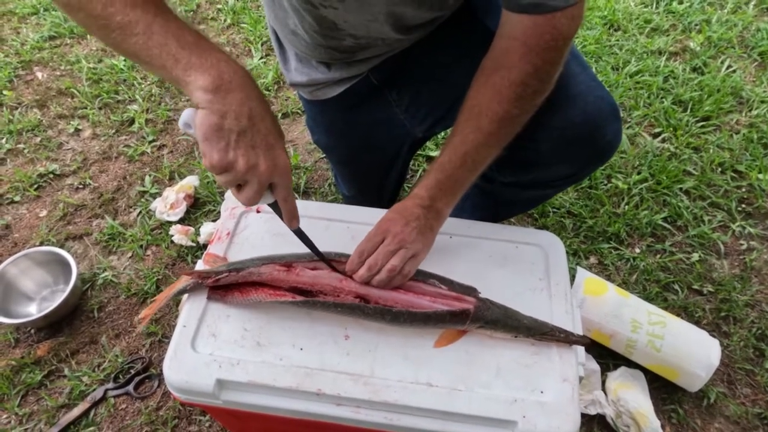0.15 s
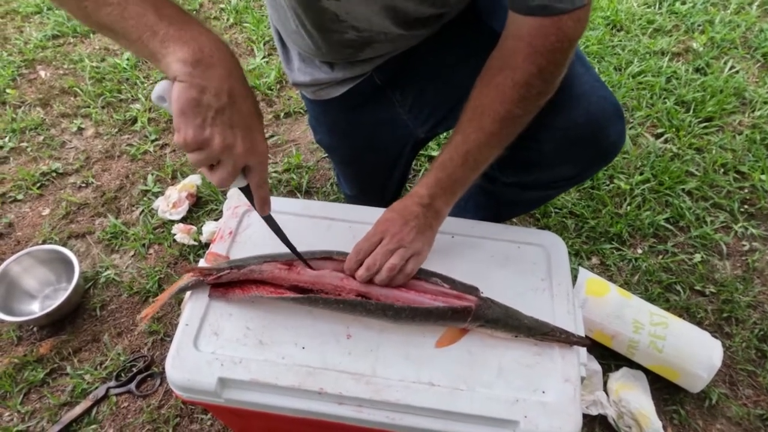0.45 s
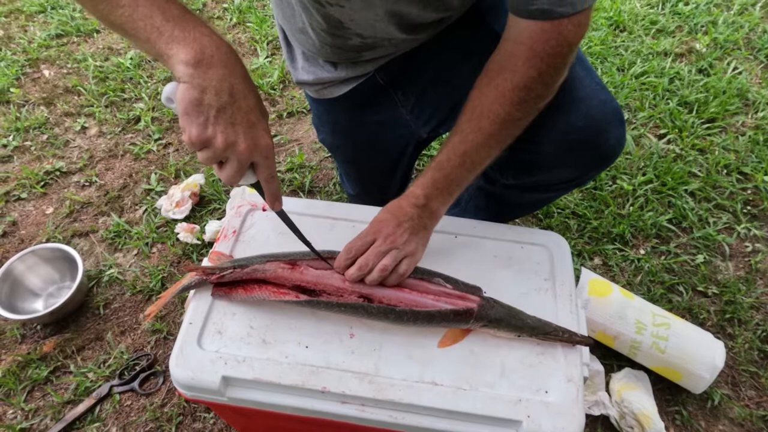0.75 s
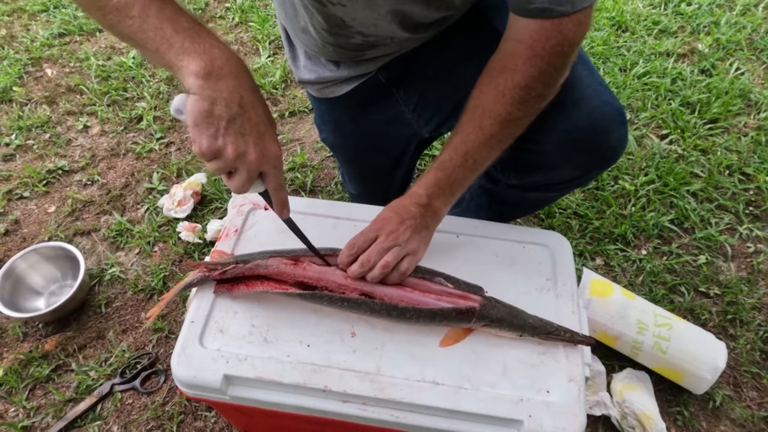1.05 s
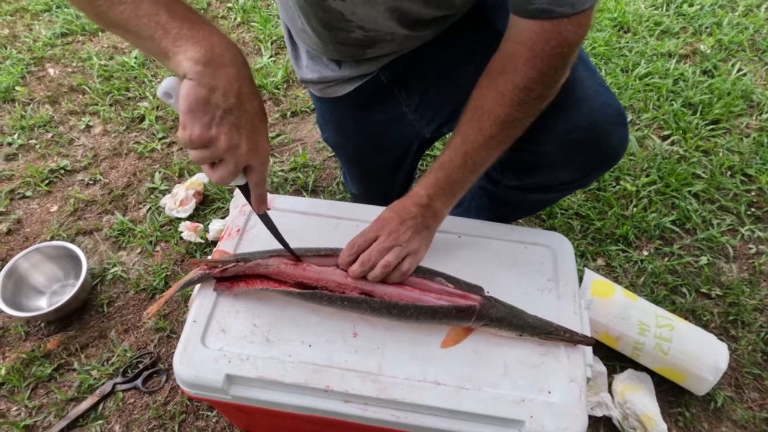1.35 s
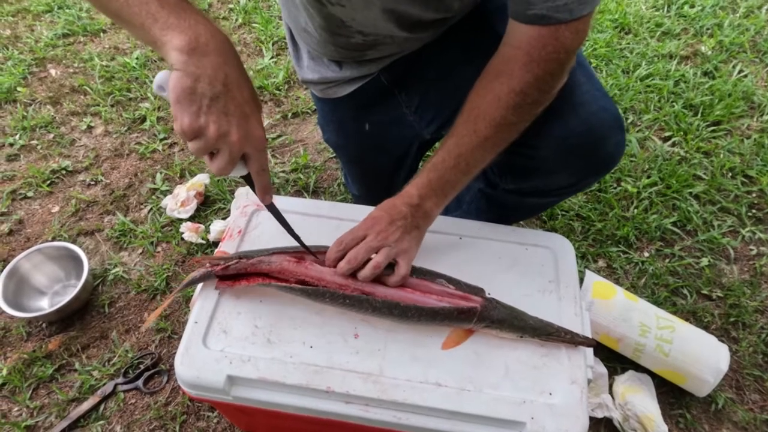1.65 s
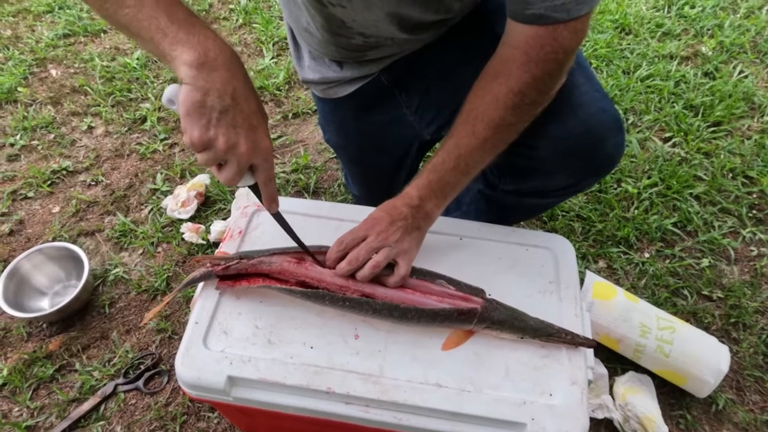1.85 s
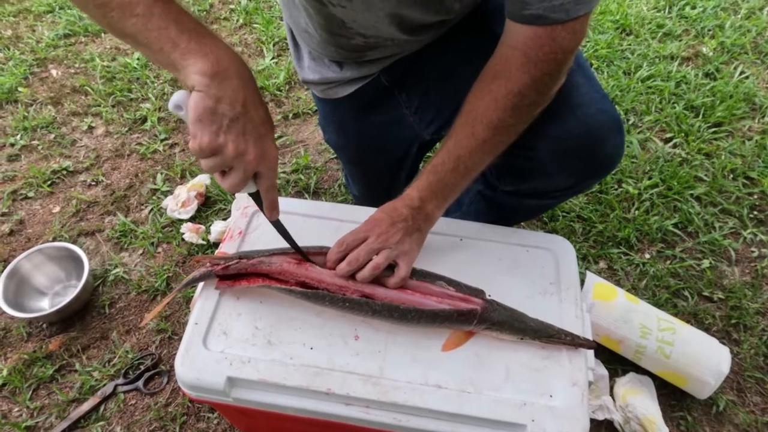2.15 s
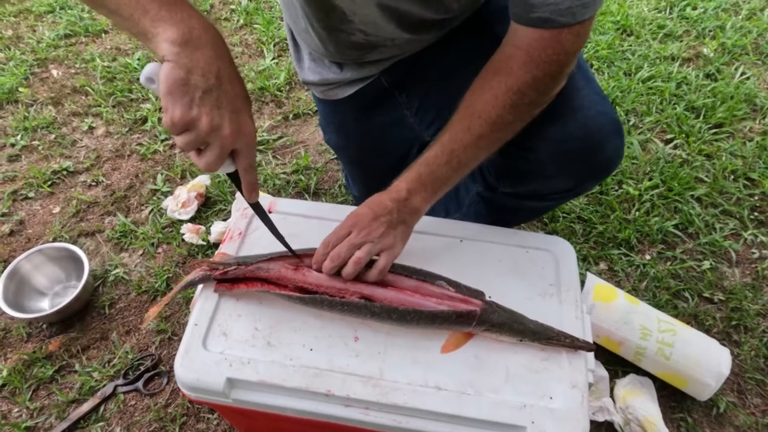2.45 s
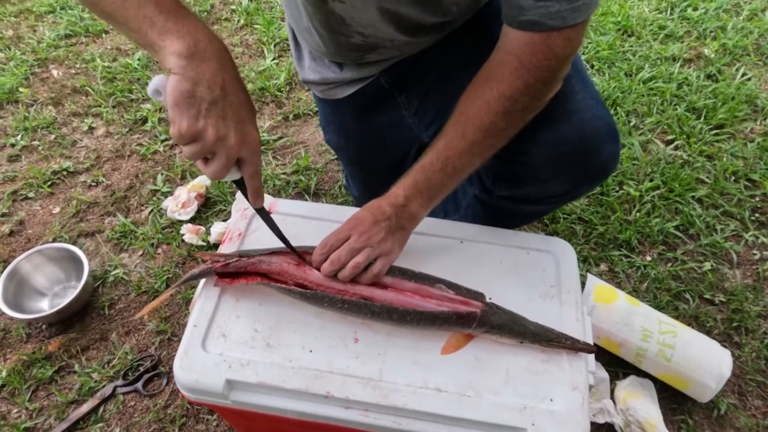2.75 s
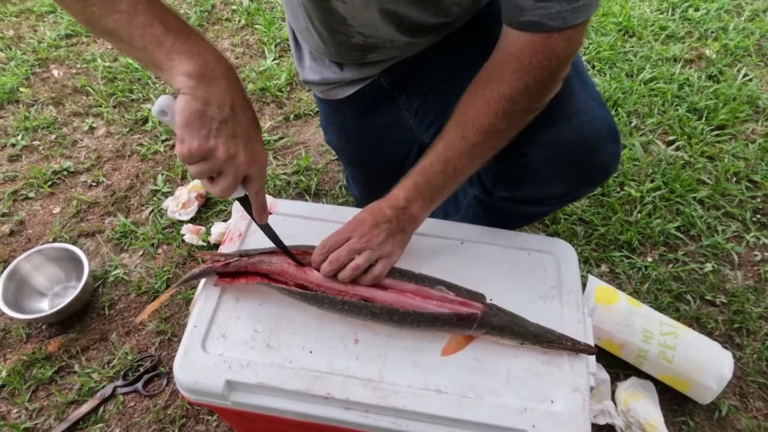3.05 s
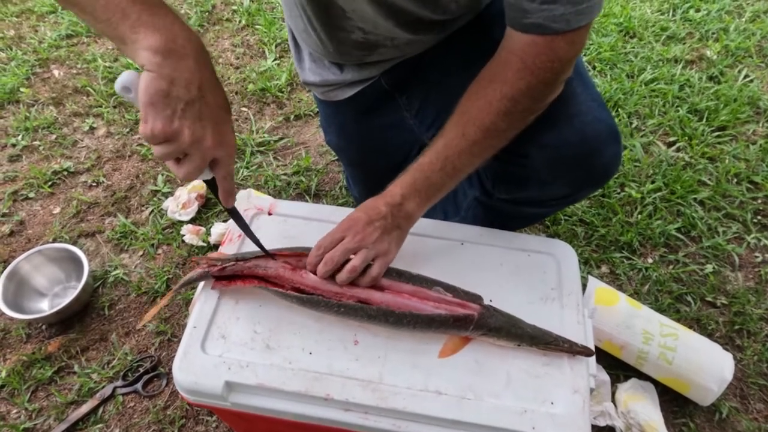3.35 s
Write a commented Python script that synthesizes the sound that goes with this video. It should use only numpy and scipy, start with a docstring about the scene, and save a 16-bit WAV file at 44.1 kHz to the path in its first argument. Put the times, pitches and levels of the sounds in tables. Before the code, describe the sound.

A knife filleting a fish, heard close in an open garden. Tight clusters of sharp bony snaps come near 0.4, 1.4, 2.3 and 3.25 seconds, each with dull hollow cooler thumps and a short crackling wet rasp that dies away. A tiny steel squeak marks the third stroke; soft taps fall near 1.9 and 3.5. Behind, a low motor hum sinks around 1.2 and returns, with faint rumble and high insect buzz.

```python
"""A far motor hum that sinks and returns, a low outdoor rumble, a buzzing katydid and a high insect chorus.
Over them a thin knife is pushed along a fish backbone in four short strokes, on the lid of a plastic cooler.
In each stroke the tip snaps over bones, the hollow cooler thumps and the blade rasps on through wet flesh.
Air, chorus and rasp are shaped noise; hum, katydid and squeaks are wavering sines; snaps excite ringing modes."""
import sys
import numpy as np
from scipy import signal
from scipy.fft import rfft, irfft, next_fast_len
from scipy.io import wavfile
from scipy.ndimage import map_coordinates

SR = 44100
rng = np.random.default_rng(int(sys.argv[2]) if len(sys.argv) > 2 else 0)


def wav_out(sig):
    """Save sig, one row per channel (or a flat mono array), as 16-bit PCM at SR to the path in sys.argv[1]."""
    wavfile.write(sys.argv[1], SR, np.round(np.clip(np.atleast_2d(sig).T, -1, 1) * 32767).astype(np.int16))


N = 154350


def amp(db):
    """Decibels to gain."""
    return 10 ** (np.asarray(db) / 20)


def unit(x):
    """Scale to rms 1."""
    return x / np.sqrt(np.mean(x ** 2) + 1e-20)


def along(points, hz):
    """Interpolate (freq_hz, value) points on a log frequency axis."""
    point_hz, value = np.transpose(points)
    return np.interp(np.log(hz + 1), np.log(point_hz + 1), value)


def wobble(knots_per_s):
    """Smooth random curve through normally distributed knots."""
    knots = rng.standard_normal(int(N * knots_per_s / SR) + 4)
    return map_coordinates(knots, [np.arange(N) * knots_per_s / SR])


def filtered(x, response):
    """Multiply the spectrum of x by a response of frequency in Hz."""
    size = x.shape[-1]
    padded = next_fast_len(size + 8192)
    spectrum = rfft(x, padded) * response(np.fft.rfftfreq(padded, 1 / SR))
    return irfft(spectrum, padded)[..., :size]


def spread(pair, alike):
    """Turn two unrelated signals into left and right of the given likeness."""
    def mid_side_gains(hz):
        turn = np.arccos(np.clip(along(alike, hz), -1, 1)) / 2
        return np.array([np.cos(turn), np.sin(turn)])

    mid, side = filtered(pair, mid_side_gains)
    return np.array([mid + side, mid - side])


def noise(gain, alike, size):
    """Stereo noise of rms 1 with a gain curve over frequency."""
    white = rng.standard_normal((2, size))
    return unit(spread(filtered(white, gain), alike))


def band(centre_hz, width_hz, alike):
    """Stereo noise of rms 1 in one resonance."""
    return noise(lambda hz: (1 + ((hz - centre_hz) / width_hz) ** 2) ** -1.5, alike, size=N)


def add(out, start_s, sound):
    """Mix a sound in at start_s."""
    part = out[..., round(start_s * SR):][..., :sound.shape[-1]]
    part += sound[..., :part.shape[-1]]


# outdoor air spectrum: freq_hz, relative_level_db
AIR_SPECTRUM = [(15, -6), (26, 9), (35, -1.5), (75, -8), (105, 1), (140, -9), (195, -7.5), (250, -22),
                (400, -22.5), (850, -30.5), (1300, -24.5), (2400, -40), (3200, -36.5), (4000, -42),
                (5400, -34), (6300, -42), (10500, -34.5), (11600, -50.5), (13800, -42), (15000, -82)]
# left-right likeness of background noise: freq_hz, likeness_0_to_1
AIR_ALIKE = [(110, 0.965), (400, 0.7), (8000, 0.55)]
# swells of far noise: centre_s, half_length_s, level_db
SWELLS = [(0.605, 0.094, -58), (2.517, 0.15, -61), (2.798, 0.082, -63.5)]
AIR_DB = -47.5
FAR_HZ, FAR_WIDTH_HZ = 1317, 310


def outdoors():
    """Low rumble and air as shaped noise; a narrow band of far noise swells under Gaussian envelopes."""
    t = np.arange(N) / SR
    level = amp(AIR_DB + 0.68 * wobble(4.846))
    air = level * noise(lambda hz: amp(along(AIR_SPECTRUM, hz)), AIR_ALIKE, size=N)
    swell = sum(amp(db) * np.exp(-((t - centre_s) / half_s) ** 2) for centre_s, half_s, db in SWELLS)
    return air + swell * band(FAR_HZ, FAR_WIDTH_HZ, AIR_ALIKE)


# motor hum level: time_s, level_db
HUM_LEVEL = [(0, -43.5), (.35, -43), (.6, -49.5), (0.899, -49), (1.2, -59.5), (1.7, -49), (2.1, -46),
             (2.85, -46), (3.15, -53.5)]
HUM_HZ, HUM_WAVER_HZ = 58.63, 0.55


def hum():
    """A far motor drones on one low note: a slightly wavering sine of changing level."""
    time_s, level_db = np.transpose(HUM_LEVEL)
    phase = 2 * np.pi * np.cumsum(HUM_HZ + HUM_WAVER_HZ * wobble(4.17)) / SR
    return amp(np.interp(np.arange(N) / SR, time_s, level_db)) * np.sqrt(2) * np.sin(phase)


# one katydid wing stroke: share_of_stroke, pitch_hz, level_db
WING_STROKE = [(0, 9900, -11), (.2, 10500, -4), (.42, 10680, 1), (.66, 10450, -3), (.84, 9500, -5.5),
               (1, 8600, -10)]
WING_STROKES_PER_S, KATYDID_GAIN_DB, KATYDID_ALIKE = 69.3, -60, 0.91
KATYDID_ROUGH_HZ, WING_TOP_HZ = 230, 11500  # pitch roughness; upper edge of the sweeping song
WING_GRIT_DB = 1.5  # unevenness of the file's teeth
WING_NOTE_HZ, WING_NOTE_WAVER_HZ, WING_NOTE_DB = 10710, 29.8, -4.5  # the wing's main resonance
WING_RING_HZ, WING_RING_WIDTH_HZ, WING_RING_DB = 13350, 310, -11  # the wing's upper resonance
CHORUS_HZ, CHORUS_WIDTH_HZ, CHORUS_DB = 7748, 620, -59.5  # many far insects blur into one band
INSECT_LEFT_DB = 1.5  # left minus right


def insects():
    """A katydid buzzes, pitch arching in every wing stroke and wing resonances sounding, over a far chorus."""
    share, pitch_hz, level_db = np.transpose(WING_STROKE)
    stroke = np.arange(N) / SR * WING_STROKES_PER_S % 1
    force = amp(np.interp(stroke, share, level_db))
    alike = [(WING_RING_HZ, KATYDID_ALIKE)]

    rough = np.array([wobble(3000), wobble(3000)])
    pitch = np.interp(stroke, share, pitch_hz) + KATYDID_ROUGH_HZ * rough
    tone = amp(WING_GRIT_DB * wobble(830)) * np.sin(2 * np.pi * np.cumsum(pitch, axis=1) / SR)
    song = unit(spread(filtered(tone, lambda hz: 1 / (1 + (hz / WING_TOP_HZ) ** 80)), alike))

    note_hz = WING_NOTE_HZ + WING_NOTE_WAVER_HZ * wobble(WING_STROKES_PER_S)
    note = amp(WING_NOTE_DB) * np.sqrt(2) * np.sin(2 * np.pi * np.cumsum(note_hz) / SR)
    # force squared: loudest at the height of the stroke
    ring = amp(WING_RING_DB) * force ** 2 * band(WING_RING_HZ, WING_RING_WIDTH_HZ, alike)
    katydid = amp(KATYDID_GAIN_DB) * force * (song + note + ring)

    chorus = amp(CHORUS_DB) * band(CHORUS_HZ, CHORUS_WIDTH_HZ, AIR_ALIKE)
    return (katydid + chorus) * amp([[INSECT_LEFT_DB / 2], [-INSECT_LEFT_DB / 2]])


YARD_DB, YARD_T60_S = -9.5, 0.19


def yard(x):
    """A faint, short scatter from the surroundings: convolution with decaying noise."""
    t = np.arange(SR // 2) / SR
    tail = rng.standard_normal((2, len(t))) * amp(-60 * t / YARD_T60_S)
    scatter = signal.fftconvolve(x, tail / np.linalg.norm(tail[0]), axes=1)[:, :N]
    return amp(YARD_DB) * scatter


# cooler modes: freq_hz, level_db, t60_s
COOLER_MODES = [(100.5, -15, 0.23), (125.5, 1, 0.14), (148.4, -5.5, 0.3), (188, -19, 0.25),
                (236, -17, 0.071), (326, -17.5, 0.063), (384.4, -18, 0.066)]
THUMP_LAG_S, THUMP_RISE_S = 0.0032, 0.0042


def cooler():
    """Each snap jolts the hollow cooler through the fish: its modes ring and decay."""
    out, t = np.zeros(N), np.arange(SR // 2) / SR
    modes = sum(amp(db - 60 * t / t60_s) * np.sin(2 * np.pi * hz * t) for hz, db, t60_s in COOLER_MODES)
    thump = -modes * (1 - np.exp(-t / THUMP_RISE_S))
    for start_s, _, thump_db, _, _ in BONES:
        add(out, start_s + THUMP_LAG_S, amp(thump_db) * thump)
    return out


SHUDDER_DB, SHUDDER_WIDTH_HZ = 3.5, 11.5  # level over the rasp; width of each mode


def shudder():
    """The dragging blade keeps the cooler rumbling softly: noise through its modes."""
    def response(f):
        return sum(amp(db) / (1 + 1j * (f - hz) / SHUDDER_WIDTH_HZ) for hz, db, _ in COOLER_MODES)

    rumble = unit(filtered(rng.standard_normal(N), lambda f: np.abs(response(f)) ** 2))
    return amp(SHUDDER_DB) * cutting() * rumble


# dull taps of the hand and the knife handle: start_s, level_db
TAPS = [(1.8822, -46), (3.482, -44.5)]
# tap spectrum: freq_hz, relative_level_db
TAP_SPECTRUM = [(400, 4), (900, -7), (1500, -1.5), (2500, -14.5), (5000, -19.5), (12000, -46)]
# left-right likeness of knife noise: freq_hz, likeness_0_to_1
KNIFE_ALIKE = [(200, .995), (600, 0.88), (2000, 1), (12000, 0.85)]
TAP_T60_S = 0.08


def taps():
    """Soft, dull contacts: decaying shaped noise."""
    out, t = np.zeros((2, N)), np.arange(SR // 6) / SR
    for start_s, db in TAPS:
        thud = noise(lambda hz: amp(along(TAP_SPECTRUM, hz)), KNIFE_ALIKE, size=len(t))
        add(out, start_s, amp(db - 60 * t / TAP_T60_S) * thud)
    return out


# steel squeaks on bone: start_s, length_s, start_hz, end_hz, level_db
SQUEAKS = [(2.305, 0.022, 5900, 7900, -36.5), (.447, 0.012, 6200, 6300, -43)]
SQUEAK_ROUGH_HZ, SQUEAK_FLICKER_DB = 300, 3.8


def squeaks():
    """Steel sticks and slips on bone: a short, rough, gliding whistle."""
    out = np.zeros(N)
    for start_s, length_s, start_hz, end_hz, db in SQUEAKS:
        share = np.linspace(0, 1, int(length_s * SR))
        hz = start_hz + (end_hz - start_hz) * share + SQUEAK_ROUGH_HZ * wobble(2480)[:len(share)]
        swell = np.sqrt(np.abs(np.sin(np.pi * share)))
        flicker = amp(SQUEAK_FLICKER_DB * wobble(770)[:len(share)])
        add(out, start_s, amp(db) * swell * flicker * np.sin(2 * np.pi * np.cumsum(hz) / SR))
    return out


# blade pushes through flesh: start_s, end_s, level_db
PUSHES = [(0.441, 0.467, -43.5), (0.477, 0.481, -47), (1.404, 1.435, -43.5), (1.453, 1.505, -55),
          (2.317, 2.402, -45.5), (2.429, 2.446, -54), (3.264, 3.28, -48.5), (3.299, 3.373, -50)]
RASP_RISE_S, RASP_T60_S = 0.0092, 0.075
RASP_TAIL_DB, RASP_TAIL_T60_S = -15, 0.54  # slower wet tail


def cutting():
    """How hard the blade cuts: each push rises, holds and dies away in a wet tail."""
    t = np.arange(N) / SR
    level = np.zeros(N)
    for start_s, end_s, db in PUSHES:
        after_s = np.maximum(t - end_s, 0)
        rise = np.clip((t - start_s) / RASP_RISE_S, 0, 1)
        fall = amp(-60 * after_s / RASP_T60_S) + amp(RASP_TAIL_DB - 60 * after_s / RASP_TAIL_T60_S)
        level += amp(db) * rise * fall
    return level


SLIPS_PER_S, SLIP_DECAY_S, SLIP_DB = 120, 0.0025, 7  # mean rate; time constant; gain over the steady cut


def slips():
    """The edge catches and lets go at an uneven rate; each slip is a sudden, decaying spurt."""
    gap, size = rng.random((2, 1000))
    at = (np.cumsum(0.5 + gap) * SR / SLIPS_PER_S).astype(int)
    kicks = np.bincount(at, 2 * size ** 2, N)[:N]
    return 1 + amp(SLIP_DB) * signal.lfilter([1], [1, -np.exp(-1 / (SLIP_DECAY_S * SR))], kicks)


# spectrum of the rasp and of the tip's crack: freq_hz, relative_level_db
RASP_SPECTRUM = [(230, 5), (450, -6), (1000, -12.5), (1500, 0), (2100, -6), (3100, -5), (4100, -1.5),
                 (5400, -6), (6700, 3), (8200, -6), (9900, -13.5), (11600, -8), (13200, -15), (14500, -40)]
GRAINS_PER_S, GRAIN_DECAY_S, RASP_SMOOTH = 450, 0.00069, 0.7  # RASP_SMOOTH: steady noise gain


def rasp():
    """Tiny tears of flesh and fine bones, each a short puff of noise, bunched into crackling slips."""
    grains = (rng.random(N) < GRAINS_PER_S / SR) * rng.random(N)
    puffs = signal.lfilter([1], [1, -np.exp(-1 / (GRAIN_DECAY_S * SR))], grains)
    tears = (RASP_SMOOTH + puffs) * rng.standard_normal((2, N))
    coloured = filtered(tears * slips(), lambda hz: amp(along(RASP_SPECTRUM, hz)))
    return cutting() * unit(spread(coloured, KNIFE_ALIKE))


# modes of blade and bone: freq_hz, level_db
BLADE_MODES = [(400, -24.5), (700, -13.5), (1400, -11.5), (1980, -12), (3150, -7.5), (4200, -8.5),
               (4950, -5), (6100, -8.5), (6800, -12), (8600, -23), (10800, -12), (11600, -7.5),
               (12450, -14.5)]
LEAD_DB, LEAD_S = -4.5, 0.008  # a short noise swells up just before each crack
CLICK_RISE_S, CRACK_DB = 0.00048, -7.5
BLADE_T60_S, BLADE_SCATTER_DB, BLADE_STAGGER_S = 0.0065, 1.5, 0.000783  # stagger: latest mode onset


def click(length_s, tilt_db):
    """A short noise swells up; then, LEAD_S after the start, a crack and the brief ring of blade and bone."""
    t = np.arange(SR // 20) / SR - LEAD_S
    after_s = np.maximum(t, 0)

    def rise(age_s):
        return 1 - np.exp(-age_s / CLICK_RISE_S)

    def tilt(hz):  # dB, pivoting at 4 kHz, constant below 500 Hz
        return tilt_db * np.log2(np.maximum(hz, 500) / 4000)

    lead_in = (t < 0) * amp(LEAD_DB + 20 * np.minimum(t, 0) / LEAD_S)
    envelope = rise(after_s) * np.exp(-(after_s / length_s) ** 2) + lead_in
    crack_noise = noise(lambda hz: amp(along(RASP_SPECTRUM, hz) + tilt(hz)), KNIFE_ALIKE, size=len(t))
    out = amp(CRACK_DB) * envelope * crack_noise
    for hz, db in BLADE_MODES:
        age_s = np.maximum(t - BLADE_STAGGER_S * rng.random(), 0)
        level_db = db + tilt(hz) + BLADE_SCATTER_DB * rng.standard_normal((2, 1))
        decay = amp(level_db - 60 * age_s / BLADE_T60_S)
        out = out + rise(age_s) * decay * np.sqrt(2) * np.sin(2 * np.pi * hz * age_s)
    return out


# tip snaps over bones: start_s, click_db, thump_db, length_ms, tilt_db_per_octave
BONES = [(0.3685, -25.5, -27, 2.6, 0), (0.4088, -25.5, -23, 4.2, 0.5), (0.435, -27, -31, 4, 0.5),
         (0.508, -40.5, -36, 4.6, 6), (1.3491, -29, -25.5, 0.9, -4.5), (1.3677, -19.5, -27.5, 1.4, -2.2),
         (1.397, -28.5, -24.5, 3.5, 0.5), (1.4428, -42.5, -34.5, 2.2, 9.5),
         (2.2695, -28.5, -22.5, 1.5, -4.5), (2.2989, -23, -52, 3.9, -1.5), (2.327, -25, -22.5, 3.9, -1),
         (2.4054, -38, -53, 2, -1), (2.4389, -32.5, -55, 3.7, 1.5), (3.2035, -29.5, -37, 2.8, 0.5),
         (3.25, -29, -29, 7.9, -1), (3.279, -40, -30.5, 3, 4.5), (3.3145, -31.5, -30.5, 4, -0.5)]
# ticks of fine bones and wet flesh: start_s, level_db, tilt_db_per_octave
TICKS = [(0.342, -41.5, -4), (1.485, -39, 4), (1.622, -53.5, 11), (2.3724, -41, 8), (2.509, -48, 6),
         (3.3404, -41, -4.5), (3.360, -41, -2)]
TICK_LENGTH_S = 0.0029


def clicks():
    """The tip snaps over bones, and fine bones and flesh give small ticks."""
    out = np.zeros((2, N))
    for start_s, click_db, _, length_ms, tilt_db in BONES:
        add(out, start_s - LEAD_S, amp(click_db) * click(length_ms / 1000, tilt_db))
    for start_s, db, tilt_db in TICKS:
        add(out, start_s - LEAD_S, amp(db) * click(TICK_LENGTH_S, tilt_db))
    return out


# knife stereo balance: freq_hz, left_minus_right_db
KNIFE_BALANCE = [(500, -0.5), (1100, -1), (2500, -0.5), (6000, 0.8), (12000, 2.5)]


def scene():
    """The knife close by, the cooler under it and the garden behind."""
    def balance(hz):
        return amp(along(KNIFE_BALANCE, hz) * np.array([[0.5], [-0.5]]))

    knife = filtered(clicks() + rasp() + squeaks() + taps(), balance)
    return knife + yard(knife) + cooler() + shudder() + hum() + outdoors() + insects()


TOP_HZ = 15600


def record(dry):
    """Remove everything from TOP_HZ upward."""
    return filtered(dry, lambda hz: hz < TOP_HZ)


dry = scene()
out = record(dry)
wav_out(out)
```